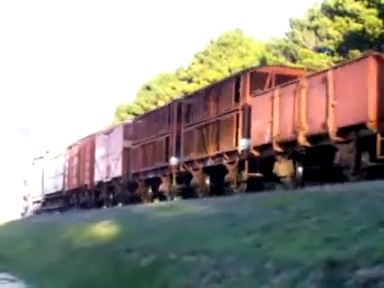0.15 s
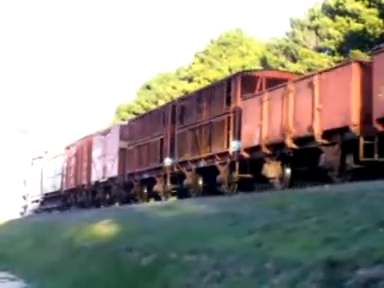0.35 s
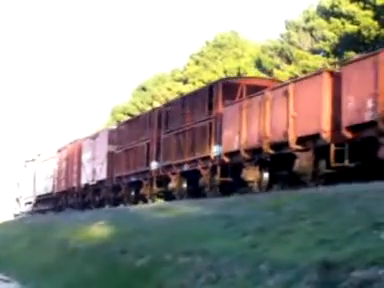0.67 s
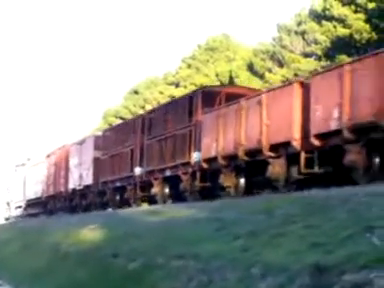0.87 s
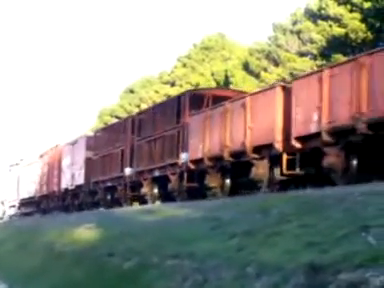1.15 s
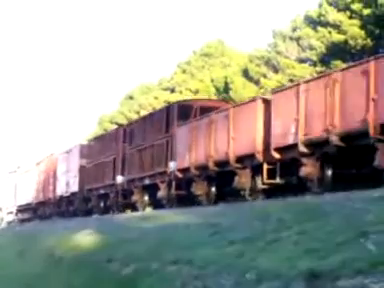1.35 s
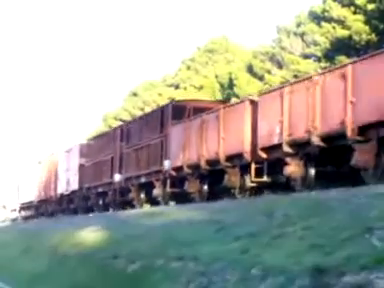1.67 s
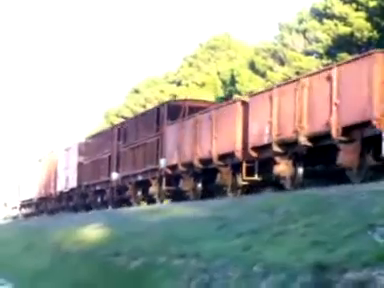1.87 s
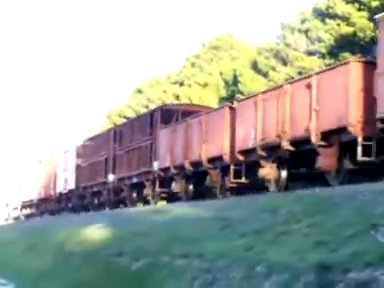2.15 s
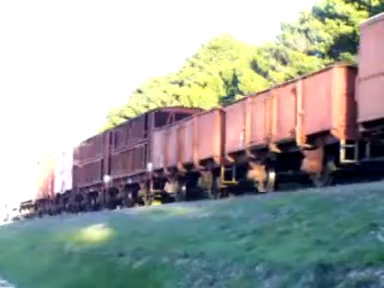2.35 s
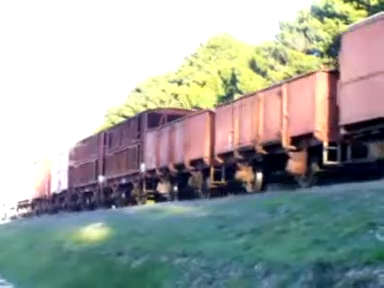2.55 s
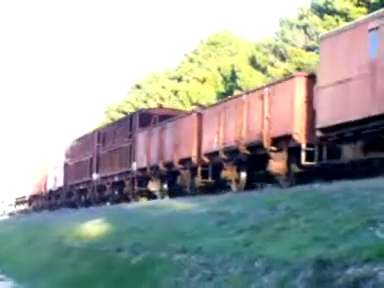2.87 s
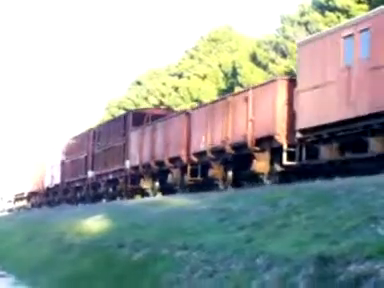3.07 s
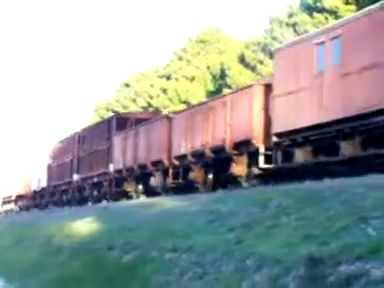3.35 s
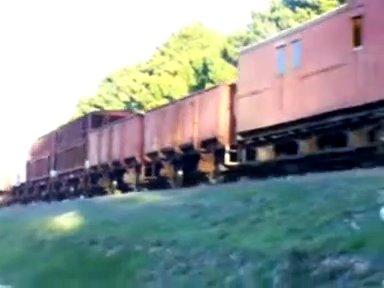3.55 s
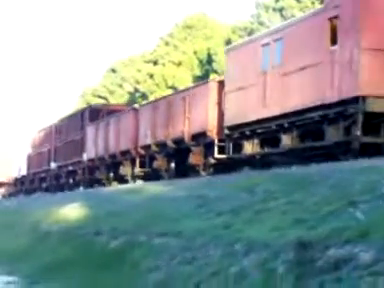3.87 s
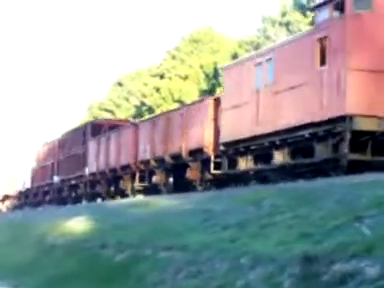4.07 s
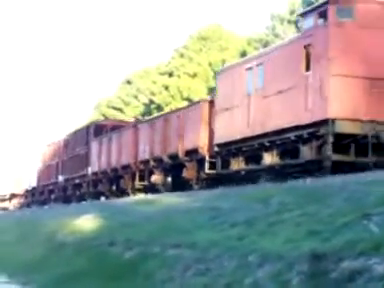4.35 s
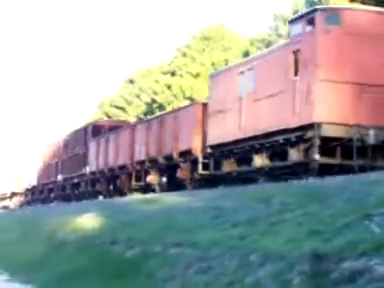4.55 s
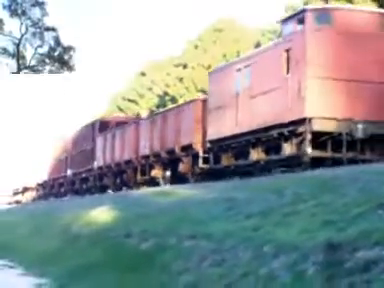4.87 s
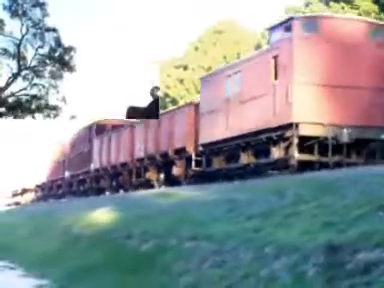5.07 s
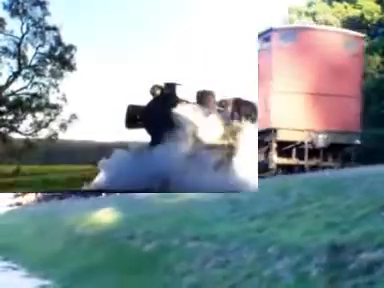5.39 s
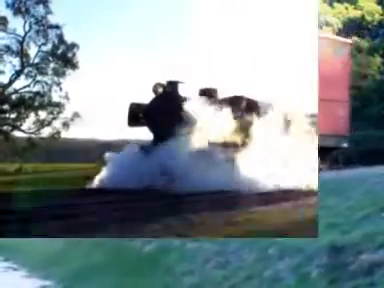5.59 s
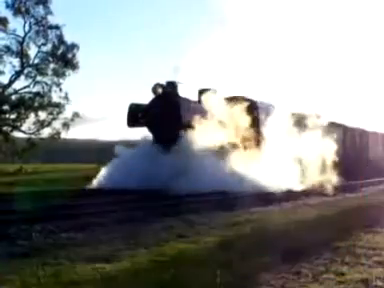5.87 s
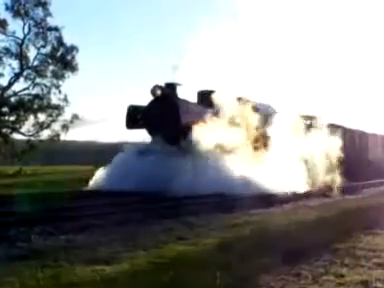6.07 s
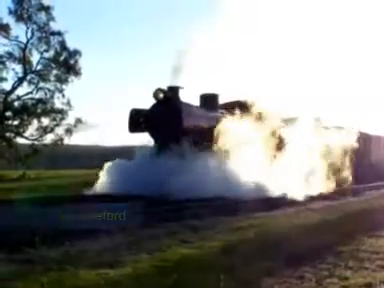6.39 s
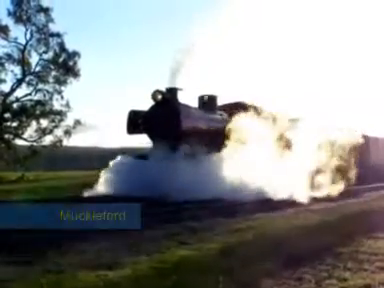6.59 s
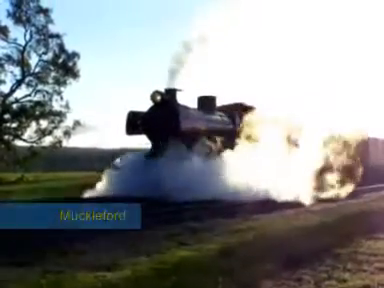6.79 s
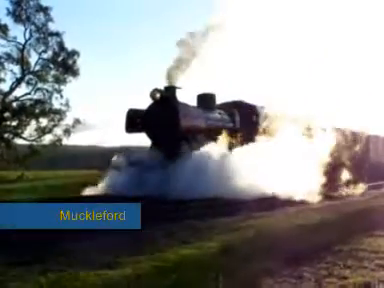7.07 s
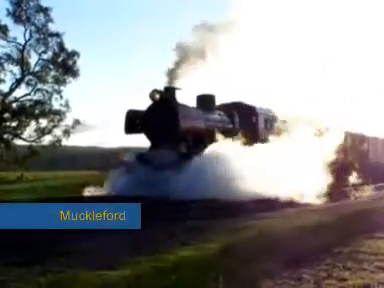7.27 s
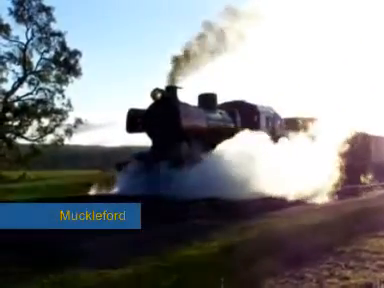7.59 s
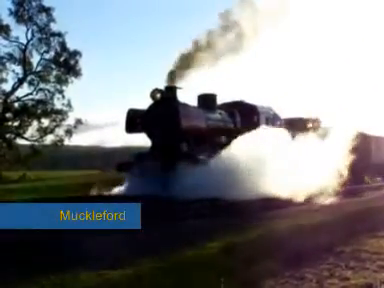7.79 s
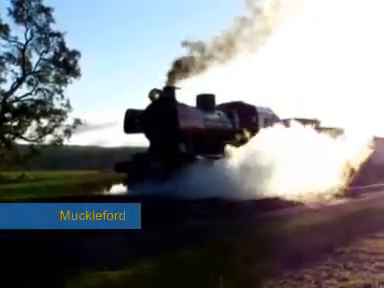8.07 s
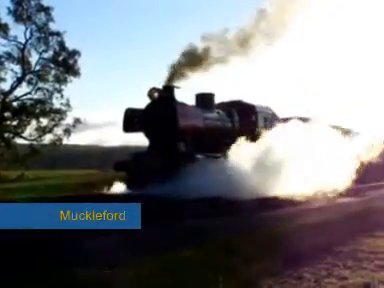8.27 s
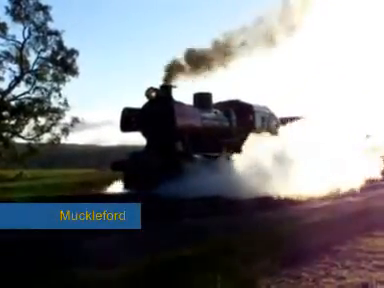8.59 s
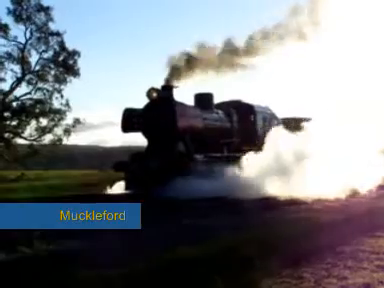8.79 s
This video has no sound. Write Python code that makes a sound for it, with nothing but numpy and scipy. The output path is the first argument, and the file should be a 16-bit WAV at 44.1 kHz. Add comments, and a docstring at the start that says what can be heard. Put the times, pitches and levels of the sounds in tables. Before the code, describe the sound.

Slow freight wagons clank and clunk over rail joints, fading into a strong steady blast of venting steam with low gusty microphone thumps.

```python
"""Goods wagons roll slowly past: shaped noise roars, decaying modes knock over rail joints, links chink, flanges squeak.
At about 5 s the wagons fade away as a standing steam locomotive fades in.
It blows steam from its cylinder drains: jet noise with pipe resonances, surging in three ranges.
Gusts of wind then buffet the single microphone: low turbulent noise and short bursts of eddies."""
import sys
import numpy as np
from scipy import signal
from scipy.fft import rfft, irfft, next_fast_len
from scipy.io import wavfile
from scipy.ndimage import uniform_filter1d

SR = 44100
rng = np.random.default_rng(int(sys.argv[2]) if len(sys.argv) > 2 else 0)


def log_audio(samples):
    """Write samples as a 16-bit WAV file to the path given in sys.argv[1]."""
    # one column per channel
    frames = np.atleast_2d(samples).T
    # limit to full scale, then quantise
    limited = np.clip(frames, -1, 1)
    pcm = np.round(limited * 32767).astype(np.int16)
    wavfile.write(sys.argv[1], SR, pcm)


N = 393813
TIME_S = np.arange(N) / SR
HOP = 128  # samples per turbulence frame
BAND_LIMIT_HZ = 10050

# Spectra are relative: each is scaled to unit power before its level is applied.
# wind strength on the microphone: time_s, level_db
WIND_STRENGTH = [(5.8, -55), (6.25, -50.5), (6.33, -50), (6.6, -42.5), (6.66, -35), (7.05, -31),
                 (7.22, -39.5), (7.6, -30.5), (7.9, -38.5), (8.02, -36.5), (8.12, -38), (8.3, -31),
                 (8.93, -29.5)]
# wind spectra, large and small eddies: freq_hz, density_db
BUFFET_SPECTRUM = [(15, -17.5), (35, -0.5), (65, 2), (110, 2.5), (145, -7), (220, -25.5), (600, -62)]
FLUTTER_SPECTRUM = [(70, -32), (115, -5), (155, 4.5), (210, -4.5), (290, -7.5), (400, -18), (560, -22),
                    (900, -38), (2000, -85)]
# gusts: centre_s, length_s, level_db, reach_hz
GUSTS = [(6.655, 0.057, -25, 260), (6.755, 0.045, -23, 360), (6.812, 0.015, -32, 650), (7.0, .17, -24, 330),
         (7.007, 0.044, -23.5, 840), (7.19, .12, -26.5, 372), (7.305, 0.035, -23, 218),
         (7.515, .08, -24.5, 324), (7.603, 0.071, -22.5, 380), (7.76, .08, -26, 180),
         (8.01, .05, -30.5, 240), (8.27, .03, -30.5, 400), (8.412, 0.031, -29, 330),
         (8.52, 0.065, -19.5, 223), (8.63, 0.061, -20.5, 304), (8.71, .08, -22, 388),
         (8.852, 0.028, -23.5, 430)]
FLUTTER_DB, FLUTTER_DB_PER_WIND_DB = 17.5, 1.552  # flutter outgrows the buffeting
EDDY_KNEE_HZ, EDDY_LOW_SHARE = 250, 0.26  # gusts thin out above the knee and below this share of reach

# steam ranges before trim and fade: time_s, rush_db, hiss_db, sizzle_db
STEAM_RANGES = [(5.65, -38, -25, -33.5), (5.8, -36, -22.3, -30.5), (6.02, -31.5, -21.5, -33),
                (6.5, -34, -22, -32), (6.8, -36.5, -21, -36), (7.0, -36, -24, -36), (7.13, -38, -21, -33),
                (7.34, -33.5, -22, -33.5), (7.6, -34, -22.5, -33.5), (8.1, -31.3, -21, -32),
                (8.45, -33.5, -22.5, -32.5), (8.93, -32.5, -22, -35)]
# fade-in of steam, buffeting and flutter: time_s, gain_db
STEAM_FADE = [(5.0, -38), (5.17, -13), (5.24, -6.5), (5.33, -1.5), (5.65, 1)]
# steam jet spectrum: freq_hz, density_db
JET_SPECTRUM = [(150, -42.5), (450, -29.5), (800, -22.5), (1200, -17), (1750, -11.5), (2450, -6.5),
                (2750, 1), (4400, 3), (5800, -10.5), (7100, -13.5), (8000, -24.5), (8800, -25.5),
                (9500, -35.5), (10000, -50.5)]
# drain pipe resonances and nulls: freq_hz, width_hz, gain_db
DRAIN_MODES = [(820, 69, -5), (1535, 70, -7.5), (1570, 110, 2.5), (1920, 44, -8), (2074, 53, -9),
               (2340, 62, 3.5), (2554, 30, -8), (2840, 120, -0.5), (2750, 70, 3), (3120, 130, 0),
               (3330, 48, 4), (3750, 120, -3), (4080, 91, 2), (4270, 34, -9.5), (5100, 110, 2)]
RUSH_TRIM_DB, HISS_TRIM_DB, SIZZLE_TRIM_DB = 0.3, -0.86, 0

# rolling noise, scaled per layer by its law: time_s, level_db
ROLLING_LEVEL = [(0, 0.5), (.25, -0.5), (.45, -1.5), (.8, -1), (1.3, -2.5), (2.05, -1.5), (2.35, -4),
                 (2.9, -3), (3.47, -7), (3.62, -5), (3.87, -3.5), (4.08, -7.5), (4.35, -5), (4.7, -5.5),
                 (5.0, -8.5)]
# fade-out of the rolling noise: time_s, gain_db
WAGON_FADE = [(5.0, 0.5), (5.13, -2.5), (5.45, -5.5), (5.75, -14.5), (6.0, -29), (6.3, -60)]
# rolling spectra (bodies, rails, rims, near-wheel treble): freq_hz, density_db
RUMBLE_SPECTRUM = [(15, -22.5), (27, -2.5), (38, 3), (58, -2), (105, 0.5), (135, -1.5), (190, -1.5),
                   (260, -4.5), (340, -17.5), (520, -39.5), (1200, -66.5)]
ROAR_SPECTRUM = [(150, -29), (330, -6), (450, -2), (620, 1), (800, -0.5), (1100, -1.5), (1500, -3.5),
                 (1800, -3), (2300, -4.5), (2800, -7.5), (3600, -16), (7000, -54)]
HISS_SPECTRUM = [(1200, -42), (2400, -8), (2850, 1.5), (3350, 2.5), (3800, 1.5), (4250, -0.5), (4650, -9),
                 (5100, -13.5), (5900, -18.5), (7000, -21.5), (7900, -31.5), (9000, -41.5), (9900, -57)]
FIZZ_SPECTRUM = [(3000, -26.5), (4600, 1), (5200, 4), (6000, -4), (7100, -10), (7900, -20), (9000, -18.5),
                 (9900, -39)]
# ringing of wheels and rails: freq_hz, width_hz, gain_db
WHEEL_RINGS = [(613, 150, -0.5), (786, 100, -3.5), (1050, 180, 0), (1270, 110, -1), (1540, 200, 3),
               (1780, 240, -2), (2056, 150, 3.5), (2280, 100, -2), (3210, 100, 2.5), (3424, 100, 3.5),
               (5080, 85, 7.5)]
# gain of the near-wheel treble: time_s, gain_db
RIM_BRIGHTNESS = [(.3, 6), (1.0, -1), (1.35, 0.5), (1.55, -3.5), (2.8, -2), (3.5, -1.5), (5.0, 2.5)]
# layer laws: level_db, layer dB per dB of rolling level
RUMBLE_LAW, ROAR_LAW, HISS_LAW, FIZZ_LAW = (-27.5, 0.68), (-24.5, 0.99), (-25, 0.86), (-37.5, 1.33)

# flange squeaks and singing wheels: centre_s, length_s, pitch_hz, level_db
SQUEAKS = [(0.503, .5, 4840, -41), (0.753, .5, 1425, -42), (1.134, 0.11, 1055, -26),
           (1.174, 0.056, 1980, -21), (2.432, .3, 1440, -40), (4.659, .04, 2106, -26),
           (4.77, .035, 2115, -30)]

# underframes shaking between joints: peak_s, level_db, rise_s
RATTLES = [(.865, -20, .013), (1.166, -20, .024), (2.115, -21.5, 0.0097), (3.73, -21, .002),
           (3.85, -25, 0.03), (4.592, -26, .004)]
RATTLE_T60_S = 0.31
# thud and underframe clash spectra: freq_hz, density_db
THUD_SPECTRUM = [(30, -16.5), (120, 6), (280, -4.5), (400, -3), (620, 7.5), (1000, 1.5), (1500, 1.5),
                 (2200, -12), (5000, -51)]
CLASH_SPECTRUM = [(500, -29), (1300, -2.5), (2100, 0), (2900, 8.5), (3600, 2.5), (4400, -2), (5600, -9),
                  (7000, -21.5), (9800, -56.5)]

# wheels dropping into rail joints: peak_s, thud_db, clash_db, rise_s, knock_hz
JOINTS = [(.294, -23.5, -19, 0.015, 503), (.435, -16, -19, 0.00092, 476), (.629, -24, -24, .004, 710),
          (1.005, -16.5, -24.5, .004, 315), (1.5704, -16, -41, 0.00051, 896),
          (2.1563, -18.5, -25, 0.0094, 556), (2.718, -17.5, -16.5, 0.0099, 565),
          (2.889, -23, -25, 0.0038, 590), (3.265, -21.5, -20.5, .001, 910),
          (3.286, -19, -18.5, 0.0078, 654), (4.435, -28, -24.5, 0.0081, 597),
          (4.991, -26.5, -24.5, 0.0039, 543)]
# modes of the solid knock: pitch_multiple, level_db, t60_s
KNOCK_MODES = [(.4, -6, 0.014), (1, -7, 0.036), (1.3, -3, 0.021), (2.1, -18, 0.0048)]
THUD_T60_S, CLASH_T60_S, KNOCK_OVER_THUD_DB = 0.13, 0.24, 9

# chinks of couplings and brake gear, before the band filter: start_s, peak_db, pitch_hz
CHINKS = [(0.514, -6, 5340), (0.651, -9, 4700), (1.218, -3.5, 4500), (1.2531, -5.5, 4520),
          (1.2835, -5, 4520), (1.3505, -16, 4570), (1.4064, -10, 4720), (2.0117, -9, 4100),
          (2.3042, -4, 4170), (2.386, -11, 3900), (2.4984, -5, 4220), (2.778, -6, 4120),
          (2.984, -5.5, 4140), (3.1284, -26, 4420), (3.2426, -5.5, 4320), (3.3425, -1, 4200),
          (3.381, -18, 3600), (3.414, -3, 4040), (3.756, -9.5, 3330), (3.8018, -13, 3900),
          (3.8477, -18, 4030), (3.902, -7.5, 3840), (4.439, -14.5, 3980), (4.793, -19, 3770),
          (4.821, -7.5, 3640), (4.8913, -6.5, 3790), (4.9165, -7.5, 3600), (5.007, -17, 3600)]
# coupling link modes before random detuning and pitch-dependent sustain: pitch_multiple, level_db, t60_s
LINK_MODES = [(.82, -13, 0.014), (.93, -8, 0.014), (1.02, 6.5, 0.0068), (1.12, 2, 0.0071),
              (1.25, -6.5, 0.0082)]
# filter on all chinks: freq_hz, gain_db
CHINK_BAND = [(1500, -31.5), (2700, -6), (3200, -1.5), (5300, -5), (6200, -2.5), (7200, -12), (9500, -37)]
CHATTER_DB, CHATTER_DB_PER_BLOW_DB = -16.5, 0.1  # chatter is almost equal after any blow


def gain_of(db):
    """Decibels to amplitude."""
    return 10 ** (np.asarray(db) / 20)


def evened(x):
    """Scales to rms 1."""
    return x / np.sqrt(np.mean(x ** 2) + 1e-20)


def read(points, hz):
    """A spectrum in dB, joined on a log-frequency axis."""
    point_hz, db = np.transpose(points)
    return np.interp(np.log(hz + 1), np.log(point_hz + 1), db)


def bumps(modes, hz):
    """Bell-shaped resonances and nulls in dB."""
    return sum(db * np.exp(-2 * ((hz - f) / width) ** 2) for f, width, db in modes)


def levels(rows):
    """The dB columns of a curve table as gains at every sample."""
    time_s, *columns = np.transpose(rows)
    return [gain_of(np.interp(TIME_S, time_s, db)) for db in columns]


def add(mix, start_s, sound):
    """Mixes a sound in place from start_s."""
    part = mix[max(round(start_s * SR), 0):][:len(sound)]
    part += sound[:len(part)]


def colour(x, shape):
    """Filters x by a dB function of frequency, keeping the power of white noise."""
    gain = evened(gain_of(shape(np.fft.rfftfreq(len(x), 1 / SR))))
    return irfft(rfft(x) * gain, len(x))


def turbulence(shape, patch_db, flicker_db, size):
    """Noise of a given spectrum with short-lived patches (size in frames, bins) and a shared flicker."""
    frames, bins = N // HOP + 12, 4 * HOP + 1
    real, imag, patches = rng.standard_normal((3, bins, frames))
    patches = uniform_filter1d(patches, size[0], axis=1)
    patches = evened(uniform_filter1d(patches, size[1], axis=0))
    flicker = evened(uniform_filter1d(rng.standard_normal(frames), size[0]))
    z = (real + 1j * imag) * gain_of(patch_db * patches + flicker_db * flicker)
    noise = signal.istft(z, nperseg=8 * HOP, noverlap=7 * HOP)[1]
    return evened(colour(np.resize(noise, next_fast_len(N)), shape)[:N])


def thud_shape(hz):
    """Thud spectrum in dB with the wheel and rail rings."""
    return read(THUD_SPECTRUM, hz) + bumps(WHEEL_RINGS, hz)


def clash_shape(hz):
    """Spectrum in dB of the dense underframe modes."""
    return read(CLASH_SPECTRUM, hz)


def burst(peak_s, level_db, rise_s, t60_s, shape):
    """Dense modes swell up to peak_s and die away: (start_s, sound)."""
    lead_s = 0.1
    t = np.arange(2 ** 14) / SR - lead_s
    swell = np.exp(np.minimum(t, 0) / rise_s)
    decay = gain_of(level_db - 60 * np.maximum(t, 0) / t60_s)
    return peak_s - lead_s, swell * decay * colour(rng.standard_normal(len(t)), shape)


def wind():
    """Large eddies buffet the microphone and small ones flutter; gusts reach various heights in pitch."""
    strength = levels(WIND_STRENGTH)[0]
    buffet = turbulence(lambda f: read(BUFFET_SPECTRUM, f), patch_db=2.5, flicker_db=3.0, size=(12, 6))
    flutter = turbulence(lambda f: read(FLUTTER_SPECTRUM, f), patch_db=0.5, flicker_db=3.5, size=(12, 6))
    flutter_gain = gain_of(FLUTTER_DB) * strength ** FLUTTER_DB_PER_WIND_DB
    out = (strength * buffet + flutter_gain * flutter) * levels(STEAM_FADE)[0]
    for centre_s, length_s, level_db, reach_hz in GUSTS:
        def eddy_shape(f):
            """Band in dB between the low share of the reach and the reach."""
            above_reach = 1 + (f / reach_hz) ** 8
            above_knee = 1 + (f / EDDY_KNEE_HZ) ** 2
            below_band = 1 + (EDDY_LOW_SHARE * reach_hz / (f + 1)) ** 4
            return -10 * np.log10(above_reach * above_knee * below_band)

        n = int(length_s * SR)
        eddy = colour(rng.standard_normal(2 ** 13), eddy_shape)[:n]
        add(out, centre_s - length_s / 2, gain_of(level_db) * evened(eddy) * np.hanning(n))
    return out


def steam():
    """Jet noise coloured by the drain pipes; its low, middle and top ranges surge as the cloud drifts."""
    jet = turbulence(lambda f: read(JET_SPECTRUM, f) + bumps(DRAIN_MODES, f),
                     patch_db=0.8, flicker_db=0.15, size=(18, 8))
    size = next_fast_len(N)
    z, hz = rfft(jet, size), np.fft.rfftfreq(size, 1 / SR)
    low = 1 / (1 + (hz / 2550) ** 16)
    top = 1 - 1 / (1 + (hz / 5500) ** 16)
    bands = (low, 1 - low - top, top)
    trims_db = (RUSH_TRIM_DB, HISS_TRIM_DB, SIZZLE_TRIM_DB)
    out = np.zeros(N)
    for gain, band, trim_db in zip(levels(STEAM_RANGES), bands, trims_db):
        out += gain_of(trim_db) * gain * evened(irfft(z * band, size)[:N])
    return out * levels(STEAM_FADE)[0]


def loose_ticks(ticks_per_s=60, tick_s=0.0022):
    """Small ticks from loose gear: random blows jiggle clash-coloured noise."""
    blow_db = 3 * np.minimum(rng.exponential(1, N), 2)
    blows = (rng.random(N) < ticks_per_s / SR) * gain_of(blow_db)
    energy = signal.lfilter([1], [1, -np.exp(-1 / (tick_s * SR))], blows ** 2)
    return evened(colour(np.sqrt(energy) * rng.standard_normal(N), clash_shape))


def rolling(tick_db=-8):
    """Bodies rumble, rails roar, wheel rims hiss and fizz, loose gear ticks; all follow one level."""
    rolling_gain = levels(ROLLING_LEVEL)[0]
    rumble = turbulence(lambda f: read(RUMBLE_SPECTRUM, f), patch_db=0.66, flicker_db=1.5, size=(20, 4))
    roar = turbulence(lambda f: read(ROAR_SPECTRUM, f) + bumps(WHEEL_RINGS, f),
                      patch_db=1.63, flicker_db=1.4, size=(30, 4))
    hiss = turbulence(lambda f: read(HISS_SPECTRUM, f) + bumps(WHEEL_RINGS, f),
                      patch_db=2.1, flicker_db=1.5, size=(16, 6))
    hiss += gain_of(tick_db) * loose_ticks()
    fizz = turbulence(lambda f: read(FIZZ_SPECTRUM, f), patch_db=3.5, flicker_db=2.5, size=(28, 5))
    fizz *= levels(RIM_BRIGHTNESS)[0]
    layers = [(rumble, RUMBLE_LAW), (roar, ROAR_LAW), (hiss, HISS_LAW), (fizz, FIZZ_LAW)]
    out = sum(sound * gain_of(db) * rolling_gain ** follow for sound, (db, follow) in layers)
    return out * levels(WAGON_FADE)[0]


def squeaks(waver_hz=28):
    """A flange rubs the rail and briefly sets one wheel mode singing."""
    out = np.zeros(N)
    for centre_s, length_s, pitch_hz, level_db in SQUEAKS:
        n = int(length_s * SR)
        waver = evened(uniform_filter1d(rng.standard_normal(SR), size=200))[:n]
        tone = np.sin(2 * np.pi * np.cumsum(pitch_hz + waver_hz * waver) / SR)
        add(out, centre_s - length_s / 2, gain_of(level_db) * np.sqrt(2) * tone * np.hanning(n))
    return out


def rattles(body_db=-8, clatter_db=1.5):
    """An underframe shakes: a longer, unevenly clattering clash with little thud."""
    out = np.zeros(N)
    for peak_s, level_db, rise_s in RATTLES:
        add(out, *burst(peak_s, level_db, rise_s, RATTLE_T60_S, clash_shape))
        add(out, *burst(peak_s, level_db + body_db, rise_s, RATTLE_T60_S, thud_shape))
    clatter = evened(uniform_filter1d(rng.standard_normal(N), size=200))
    return out * evened(gain_of(clatter_db * clatter))


def joints(contact_s=0.00029):
    """Each wheel drops into a joint: a solid knock, a low thud and a clash of dense underframe modes."""
    out, t = np.zeros(N), np.arange(2 ** 12) / SR
    for peak_s, thud_db, clash_db, rise_s, knock_hz in JOINTS:
        add(out, *burst(peak_s, thud_db, rise_s, THUD_T60_S, thud_shape))
        add(out, *burst(peak_s, clash_db, rise_s, CLASH_T60_S, clash_shape))
        knock = np.zeros(len(t))
        for multiple, mode_db, t60_s in KNOCK_MODES:
            knock -= gain_of(mode_db - 60 * t / t60_s) * np.sin(2 * np.pi * multiple * knock_hz * t)
        onset = 1 - np.exp(-t / contact_s)
        add(out, peak_s, gain_of(thud_db + KNOCK_OVER_THUD_DB) * knock * onset)
    return out


def chinks(chatter_t60_s=0.12, ring_hz=3450, ring_t60_s=0.21, ring_db=-6):
    """Steel links strike twice within milliseconds, then chatter and ring; low, heavy links sustain longest."""
    out, t = np.zeros(N), np.arange(2 ** 13) / SR
    for start_s, peak_db, pitch_hz in CHINKS:
        chatter_noise, ring_noise = rng.standard_normal((2, len(t)))
        sustain = (4300 / pitch_hz) ** 4
        blow = np.zeros(len(t))
        for multiple, mode_db, t60_s in LINK_MODES:
            mode_hz = pitch_hz * multiple * rng.uniform(0.9, 1.02)
            decay = gain_of(mode_db - 60 * t / (t60_s * sustain))
            blow += decay * np.sin(2 * np.pi * (mode_hz * t + rng.random()))
        blow *= 1 - np.exp(-t / 0.00051)
        strike = 1.6 * blow
        add(strike, rng.uniform(0.0022, 0.0026), blow)  # second strike
        strike *= gain_of(peak_db) / abs(strike).max()

        chatter = colour(chatter_noise, lambda f: -12 * np.log10(1 + ((f - pitch_hz) / 800) ** 4))
        chatter *= gain_of(-60 * t / chatter_t60_s)
        ring = colour(ring_noise, lambda f: -18 * np.log10(1 + ((f - ring_hz) / 380) ** 2))
        ring *= gain_of(ring_db - 60 * t / ring_t60_s)
        tail = (chatter + ring) * (1 - np.exp(-t / 0.0022))
        add(out, start_s, strike + gain_of(CHATTER_DB + CHATTER_DB_PER_BLOW_DB * peak_db) * tail)
    size = next_fast_len(N)
    band = gain_of(read(CHINK_BAND, np.fft.rfftfreq(size, 1 / SR)))
    return irfft(rfft(out, size) * band, size)[:N]


def scene():
    """Everything reaches one microphone, the same in both channels."""
    mono = wind() + steam() + rolling() + squeaks() + rattles() + joints() + chinks()
    return np.array([mono, mono])


def record(dry):
    """The band limit of the recorder: a linear-phase low-pass."""
    lowpass = signal.firwin(511, BAND_LIMIT_HZ, window=("kaiser", 9), fs=SR)
    return signal.oaconvolve(dry, lowpass[None], "same")


dry = scene()
out = record(dry)
log_audio(out)
```